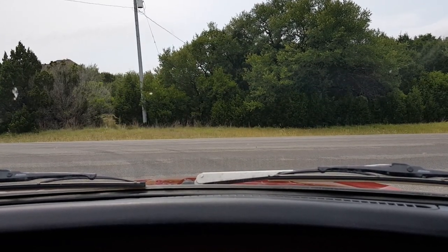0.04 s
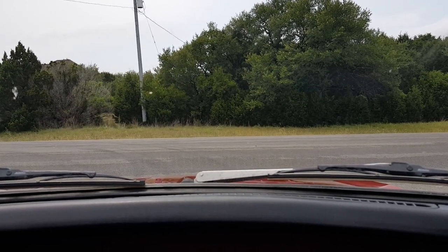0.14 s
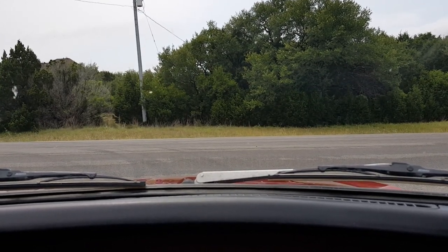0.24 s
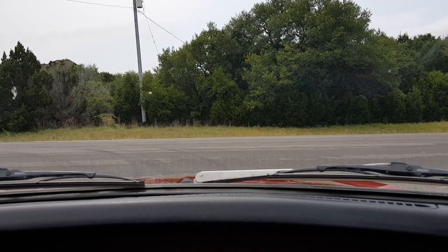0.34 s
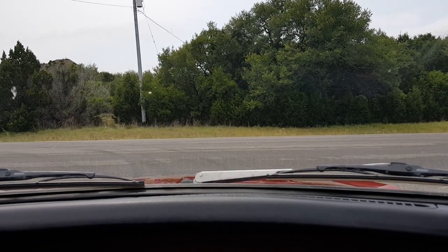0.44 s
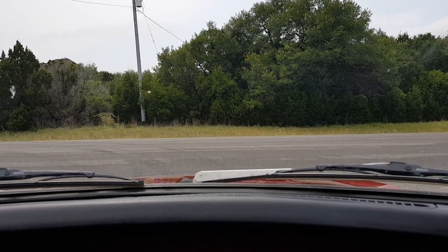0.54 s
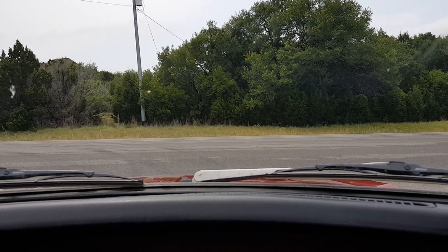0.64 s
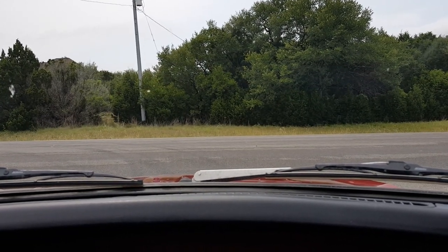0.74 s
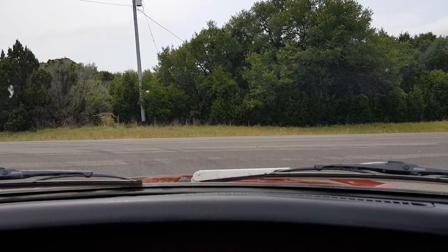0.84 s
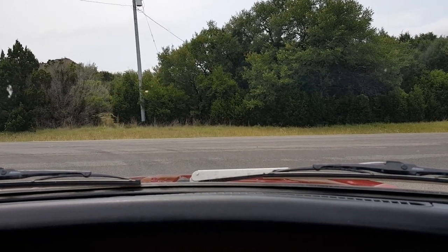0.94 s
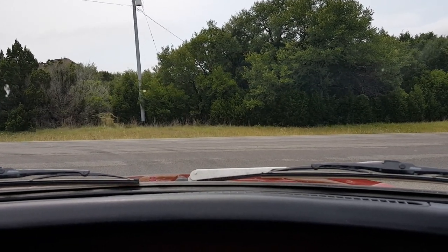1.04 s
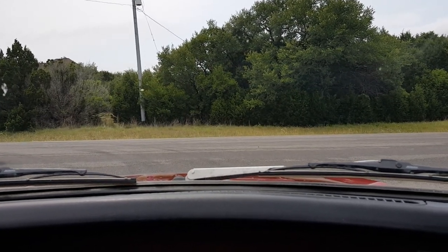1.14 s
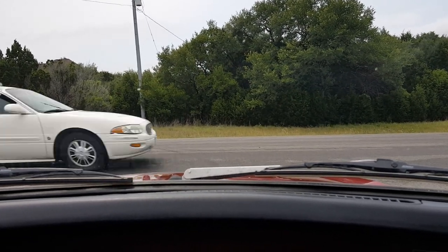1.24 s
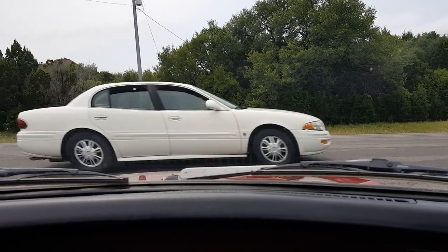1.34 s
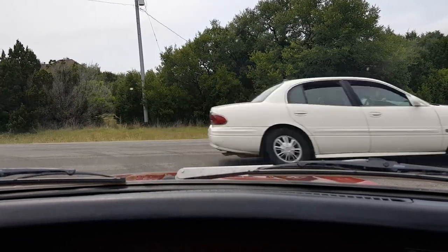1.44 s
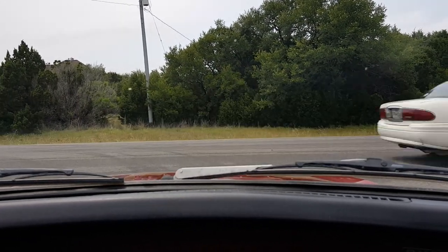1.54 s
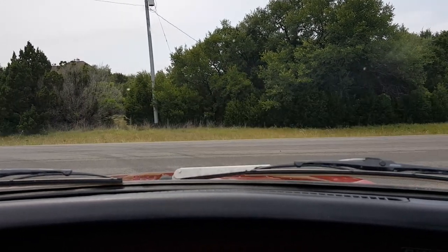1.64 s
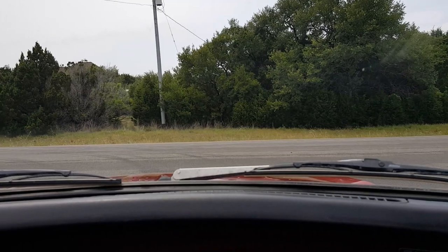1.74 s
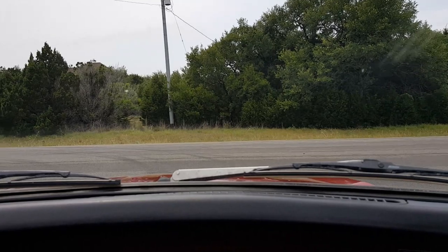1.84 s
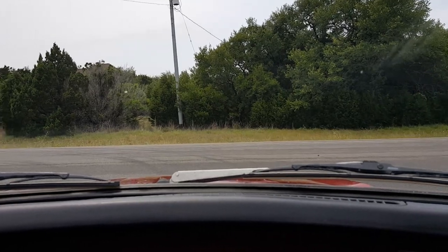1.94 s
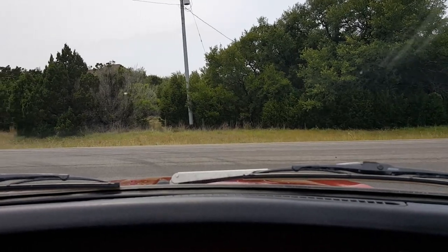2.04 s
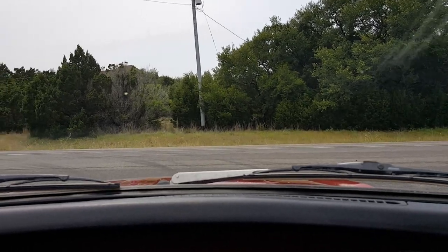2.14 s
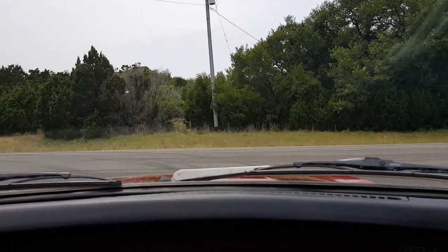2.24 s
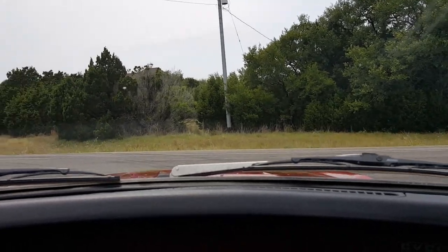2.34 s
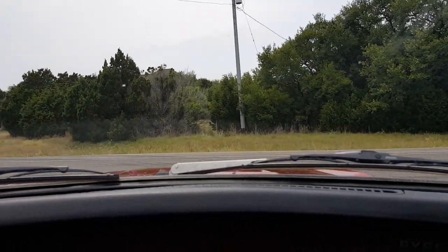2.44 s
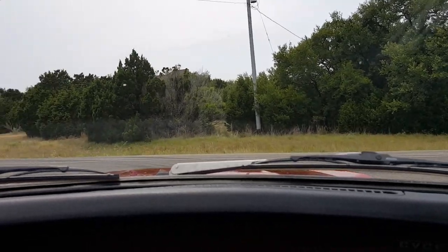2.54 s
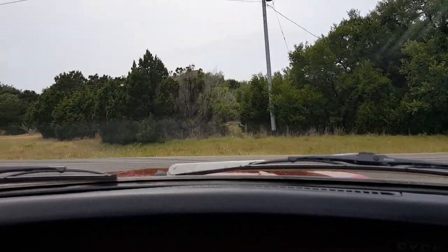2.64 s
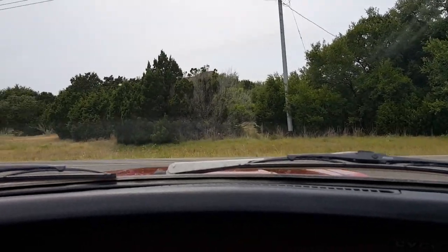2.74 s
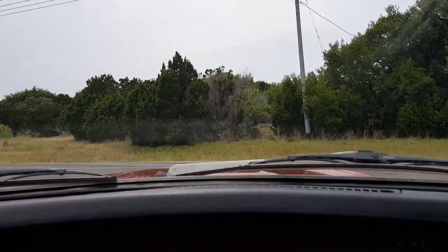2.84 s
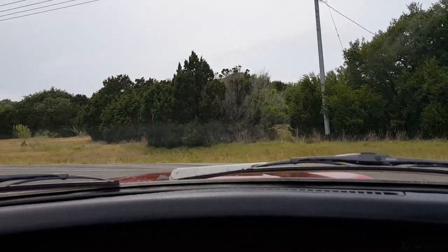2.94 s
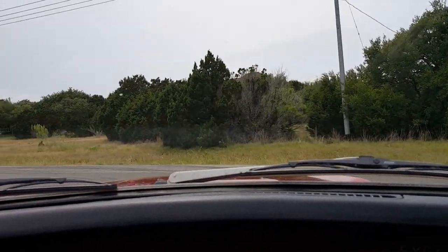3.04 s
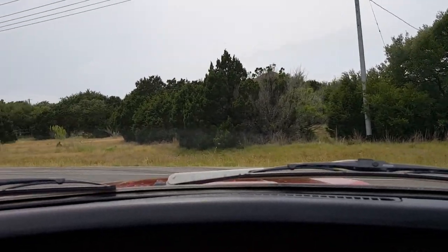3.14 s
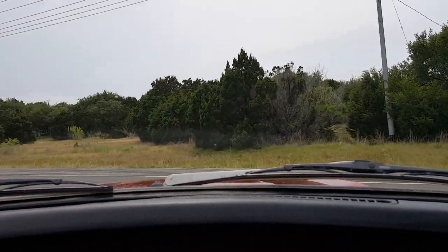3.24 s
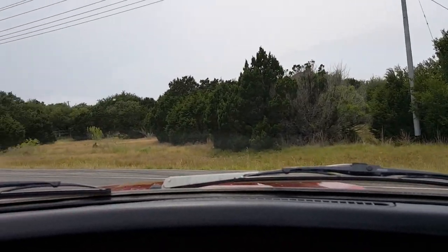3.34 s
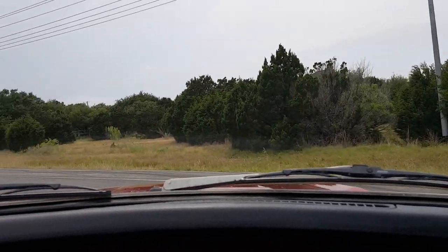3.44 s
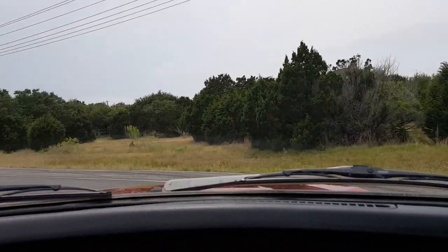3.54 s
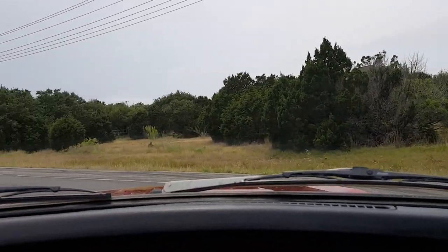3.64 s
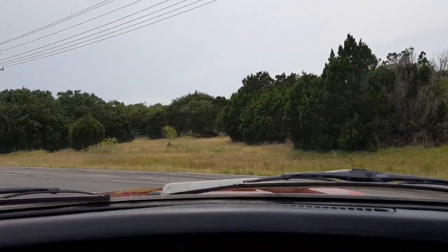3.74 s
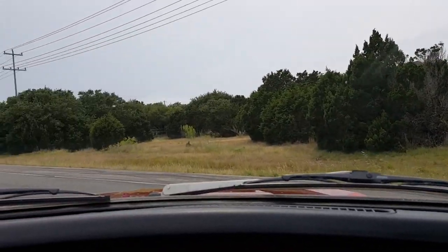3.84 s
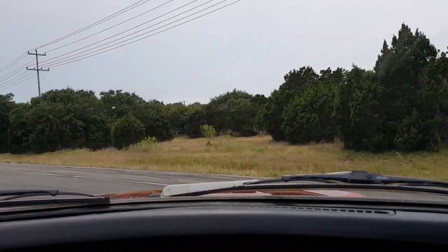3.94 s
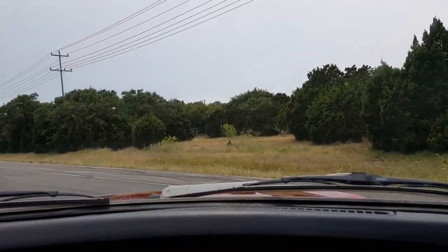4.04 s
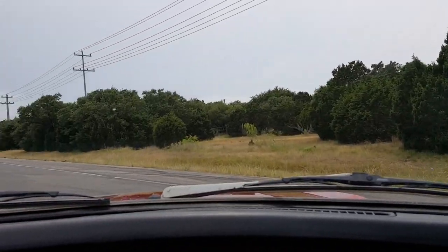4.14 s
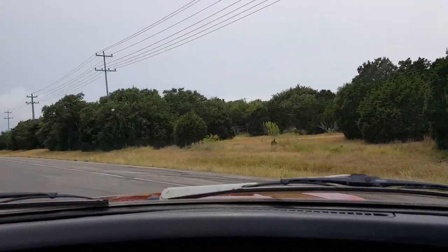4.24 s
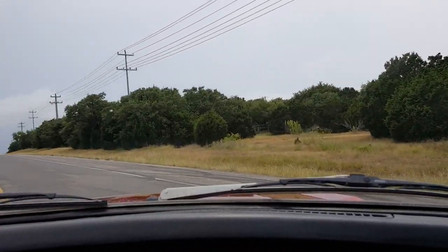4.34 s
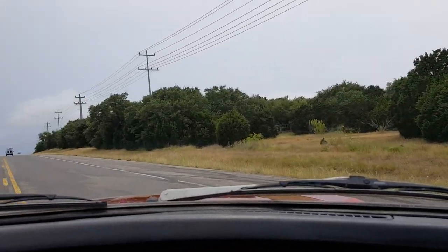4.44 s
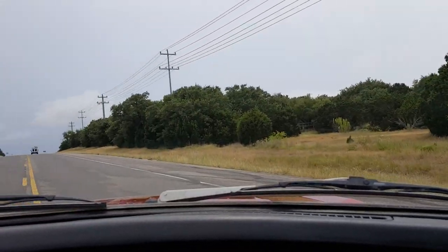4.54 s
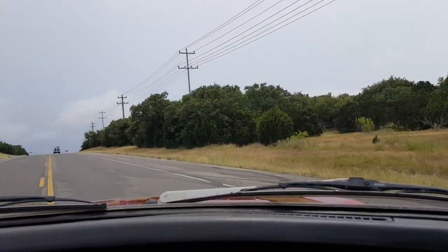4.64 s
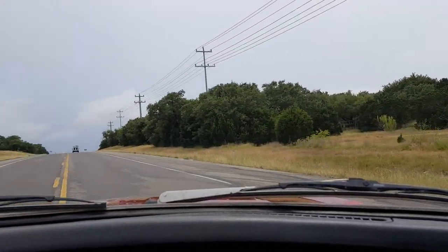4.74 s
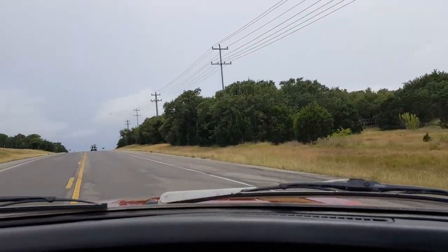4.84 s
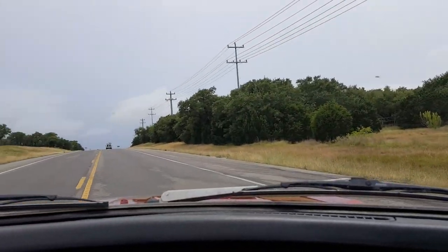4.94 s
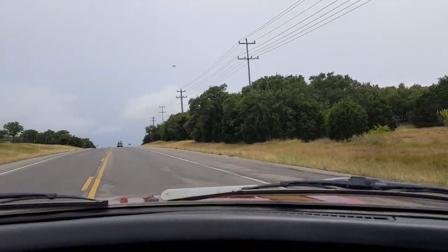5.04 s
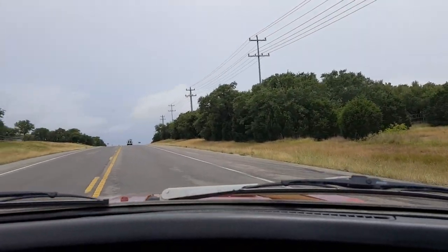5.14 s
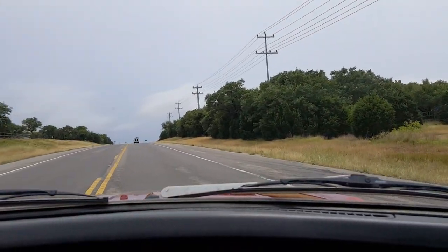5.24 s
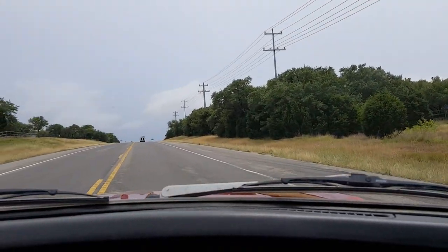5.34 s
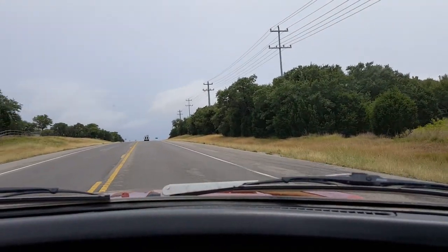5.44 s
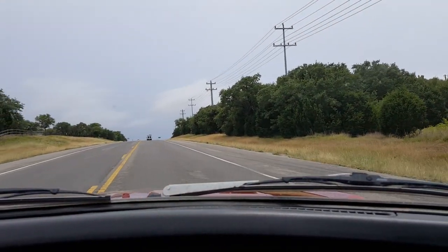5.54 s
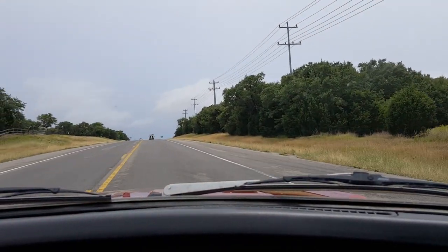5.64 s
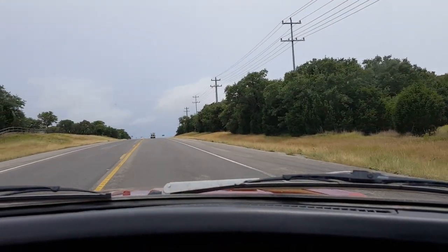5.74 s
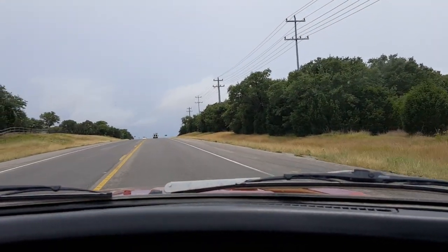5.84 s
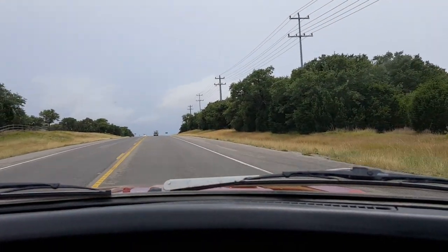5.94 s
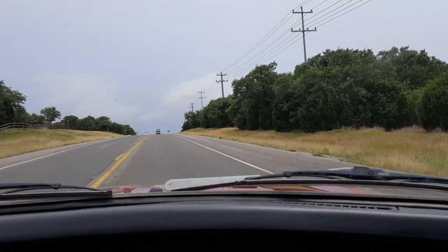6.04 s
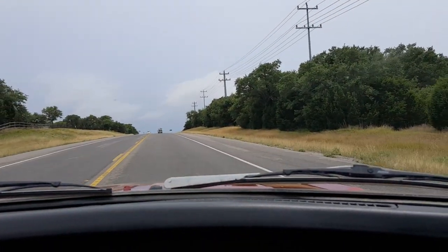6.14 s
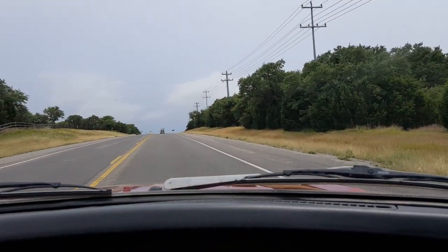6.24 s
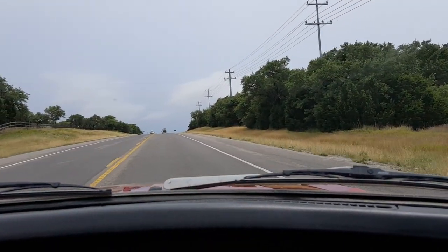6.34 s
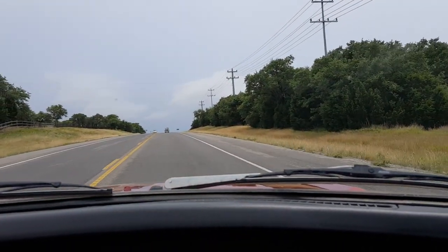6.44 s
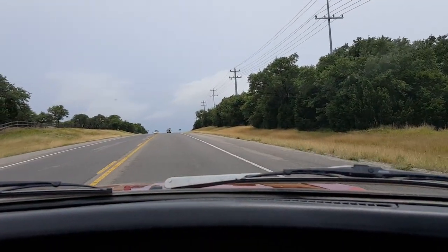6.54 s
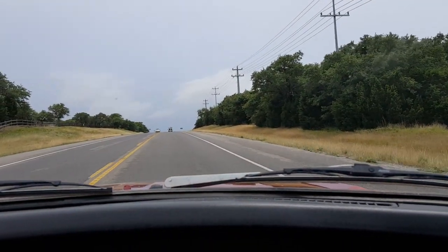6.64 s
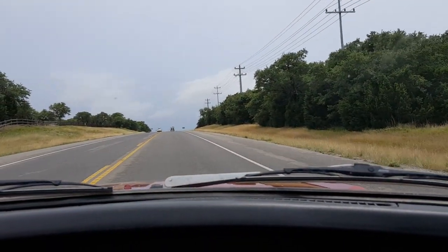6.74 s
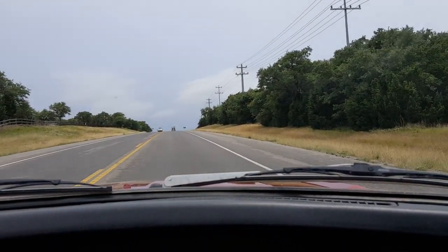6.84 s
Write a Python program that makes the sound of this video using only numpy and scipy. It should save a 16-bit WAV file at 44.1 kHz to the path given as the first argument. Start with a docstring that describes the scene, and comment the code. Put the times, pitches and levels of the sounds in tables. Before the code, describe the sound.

Heard inside a small car, a quiet low idle flutters while the indicator relay clicks in and out. At about one second the revs climb quickly, with a sharp hollow trim knock, and the car pulls away. The boomy, gruff engine note then rises gradually in one gear, growing louder with tyre and road rumble. Deep bumps thump near the end. Close stereo cabin microphones.

```python
"""A small four-cylinder engine heard from inside the car: it idles, pulls out and gathers speed in one gear.
Firing-rate tones boom through cabin resonances over a gruff growl at quarters of the firing rate.
Shaped noise makes the body rumble, combustion, hiss, tyres and road; jolts set damped body modes swinging.
Up close in the cabin the indicator relay ticks and rings, loose trim clicks and knocks, plastics squeak
and a drive belt chirps faintly. A stereo microphone pair adds its own hiss."""
import sys
import numpy as np
from scipy import signal
from scipy.fft import rfft, irfft, next_fast_len
from scipy.io import wavfile

SR = 44100
rng = np.random.default_rng(int(sys.argv[2]) if len(sys.argv) > 2 else 0)


def int16_out(signal):
    """Quantize to a 16-bit WAV file."""
    q = np.round(np.clip(np.atleast_2d(signal).T, -1, 1) * 32767)
    wavfile.write(sys.argv[1], SR, q.astype(np.int16))


N = 303798  # samples
REFERENCE_RATE = 75  # firings per second at which the layer levels and throb depths are stated


def from_db(db):
    """Decibels to amplitude gain."""
    return 10 ** (np.asarray(db) / 20)


def rms_one(x):
    """Scale to unit power."""
    return x / np.sqrt(np.mean(x ** 2) + 1e-20)


def in_time(curve):
    """Read a two-column curve at every sample, straight between its points."""
    time_s, value = np.transpose(curve)
    return np.interp(np.arange(N) / SR, time_s, value)


def at_hz(points, hz):
    """Read a spectrum on a log-frequency axis."""
    known_hz, value = np.transpose(points)
    return np.interp(np.log(hz + 1e-3), np.log(known_hz), value)


def colour(x, spectrum):
    """Filter by a spectrum that falls away beyond its ends; unit power."""
    length = x.shape[-1]
    size = next_fast_len(length)
    hz = np.fft.rfftfreq(size, 1 / SR) + 1e-3
    lowest_hz, highest_hz = spectrum[0][0], spectrum[-1][0]
    skirts = np.minimum(1, np.minimum(hz / lowest_hz, highest_hz / hz)) ** 4
    gain = from_db(at_hz(spectrum, hz)) * skirts
    return rms_one(irfft(rfft(x, size) * gain, size)[..., :length])


# Left-right likeness of the diffuse cabin sound: freq_hz, likeness (1 = identical)
EAR_LIKENESS = [(60, 0.99), (170, 1), (300, .78), (520, 0.69), (900, 0.057), (1500, 0.37), (2600, 0.086),
                (9000, 0.085)]


def diffuse(mid, side):
    """Two unrelated signals become a stereo field, alike in the bass and apart in the treble."""
    size = next_fast_len(N)
    alike = np.clip(at_hz(EAR_LIKENESS, np.fft.rfftfreq(size, 1 / SR)), -.99, .999)
    shared = rfft(mid, size) * np.sqrt(1 + alike)
    opposed = rfft(side, size) * np.sqrt(1 - alike)
    return irfft(np.array([shared + opposed, shared - opposed]), size)[:, :N]


def noise(spectrum):
    """Diffuse stereo noise of a given colour, at unit power."""
    return colour(diffuse(*rng.standard_normal((2, N))), spectrum)


def drift(rate):
    """Random wander through points of unit spread, 2 * rate of them per second."""
    knots = rng.standard_normal(4096)
    return np.interp(np.arange(N) / SR * rate * 2, np.arange(len(knots)), knots)


def swell_and_fade(seconds_from_peak, length_s):
    """Bell-shaped envelope, at half power half a length either side of its peak."""
    return 2 ** (-2 * (seconds_from_peak / length_s) ** 2)


def strikes(times, levels_db):
    """A train of single-sample clicks."""
    out = np.zeros(N)
    positions = np.round(np.asarray(times) * SR).astype(int)
    out[np.clip(positions, 0, N - 1)] = from_db(levels_db)
    return out + 1e-18  # keeps the filters clear of vanishingly small numbers


def die_away(clicks, t60):
    """The exponential envelope that follows each click, falling 60 dB in t60 seconds."""
    return signal.lfilter([1], [1, -from_db(-60 / (t60 * SR))], clicks)


def ring(times, levels_db, modes, spread_db):
    """Every blow sets damped modes ringing, each with a random strength of its own."""
    out = np.zeros(N)
    for hz, db, t60 in modes:
        radius = from_db(-60 / (t60 * SR))
        angle = 2 * np.pi * hz / SR
        strengths_db = levels_db + db + spread_db * rng.standard_normal(len(times))
        resonator = [1, -2 * radius * np.cos(angle), radius * radius]
        out += signal.lfilter([0, np.sin(angle)], resonator, strikes(times, strengths_db))
    return out


# Strongest engine lines: firing_multiple, level_db before load and cabin
ENGINE_LINES = [(1, -0.14), (2, -0.6), (2.25, -16), (2.5, -24.5), (3, -8), (3.5, -19), (4, -13), (5, -20),
                (6, -25.5), (6.5, -35.5), (8, -37.5), (9, -34), (14.5, -36.5)]


def boom(firings, rate, load_db, waver_db, size=200):
    """Nearly pure engine lines pump the cabin air and swell through its resonances; high ones waver more."""
    out = np.zeros(N)
    speeds = np.linspace(rate.min(), rate.max(), size)
    for multiple, db in ENGINE_LINES:
        answer_db = np.interp(rate, speeds, cabin_db(multiple * speeds))
        level = from_db(db + load_db + answer_db + waver_db * np.sqrt(multiple) * drift(8))
        out -= np.sqrt(2) * level * np.sin(2 * np.pi * multiple * firings)
    return out


# Resonances of mounts, cabin air and panels: centre_hz, width_hz (between -6 dB points), level_db
CABIN_RESONANCES = [(28.1, 11.2, -23.5), (61.4, 4.8, -15), (70.45, 9.2, -12), (82.86, 6.76, -14.5),
                    (87.6, 16, -24), (125.6, 9.4, -15), (133.4, 42.3, -19.5), (191.8, 30, -28),
                    (229.9, 31, -21), (269.3, 12, -25.5), (295.8, 36, -20.5), (400, 17, -21),
                    (429, 52, -23.5), (507, 50, -20.5), (780, 330, -18.5), (1173, 65, -13)]


def cabin_db(hz):
    """How strongly the cabin answers at a frequency: its resonances add in power."""
    power = 0
    for centre, width, db in CABIN_RESONANCES:
        power = power + from_db(db) ** 2 / (1 + (2 * (hz - centre) / width) ** 2) ** 2
    return 10 * np.log10(power)


# Moments when one line sings out: firing_multiple, peak_s, length_s, level_db before waver
LINE_SWELLS = [(4, 1.286, 0.097, -31), (5, 2.64, 0.31, -39.5), (2.25, 3.25, .4, -25.5),
               (8, 3.5, 0.33, -51.5), (5.75, 3.85, .38, -42.5), (2.5, 3.99, 0.24, -28.5),
               (6.5, 4.41, 0.27, -43), (3.5, 4.93, 0.22, -35), (6, 5.23, .35, -43.5), (9, 6.55, 0.69, -49)]


def swells(firings, waver_db):
    """Single engine lines sing out for a moment as they sweep through a panel or pipe resonance."""
    t, out = np.arange(N) / SR, np.zeros(N)
    for multiple, peak_s, length_s, db in LINE_SWELLS:
        near = np.abs(t - peak_s) < 2 * length_s
        wavering = from_db(db + waver_db * drift(8.7)[near])
        bell = swell_and_fade(t[near] - peak_s, length_s) * wavering
        tone = np.sin(2 * np.pi * (multiple * firings[near] + rng.random()))
        out[near] += np.sqrt(2) * bell * tone
    return out


# Colour of the gruff engine note: freq_hz, relative_level_db
GROWL_COLOUR = [(110, -32), (170, 3.5), (250, 0), (320, -6), (390, -1), (490, -2.5), (620, -6), (720, -8),
                (810, -2), (930, -15.5), (1150, -12.5), (1400, -17), (2200, -31), (3500, -40)]
GROWL_DB, GROWL_PER_LOAD = -38, 1.016  # dB at zero load; dB per dB of load


def growl(firings, load_db, rough, size=8192, count=150):
    """Four unequal cylinders repeat every fourth firing: lines at each quarter of the firing rate."""
    lines = np.exp(2j * np.pi * rng.random(count))
    lines[::2] *= from_db(5)  # whole turns of the crank stand out
    lines[0:21:4] = 0  # the five lowest firing multiples belong to the boom
    # no two burns are timed quite alike, which blurs the highest lines
    cycles = (firings + rough * drift(7.7)) / 4
    # each line meets the two ears out of step
    skew = 1j * rng.choice([-1, 1], count)
    waves = [irfft(spectrum, size) for spectrum in (lines, lines * skew)]
    paths = [np.interp(cycles % 1 * size, np.arange(size), wave) for wave in waves]
    return from_db(GROWL_DB + GROWL_PER_LOAD * load_db) * colour(diffuse(*paths), GROWL_COLOUR)


def throb(firings, depth):
    """Unit-power swelling of a noise with every firing."""
    return rms_one(1 + np.clip(depth, 0, 1) * np.cos(2 * np.pi * firings))


# Colour of the low body rumble: freq_hz, relative_level_db
BODY_COLOUR = [(70, -38.5), (105, -8.5), (125, 0), (152, 1.5), (190, -9.5), (240, -22.5), (320, -16.5),
               (550, -52)]
# Level of the body rumble: time_s, level_db
BODY_RUMBLE_LEVEL = [(0, -39), (.28, -37), (.36, -44.5), (.8, -41), (1.05, -31.5), (2.4, -34), (3.1, -29),
                     (4.4, -26), (4.56, -30), (4.9, -28.5), (5.35, -28.5), (5.6, -27), (6.89, -27.5)]
BODY_THROB = 0.11  # depth at the reference rate


def body_rumble(firings, rate):
    """The engine shakes low noise out of the body; single firings stand out at idle and blur with speed."""
    pulses = throb(firings, BODY_THROB * REFERENCE_RATE / rate)
    return from_db(in_time(BODY_RUMBLE_LEVEL)) * noise(BODY_COLOUR) * pulses


# Colour of the combustion noise: freq_hz, relative_level_db
COMBUSTION_COLOUR = [(450, -25), (680, -9.5), (800, -2.5), (900, -6.5), (1010, -3), (1300, -13), (1600, -9),
                     (1900, -13), (2250, -12.5), (2800, -20), (3500, -24.5), (5500, -34.5)]
# Colour of the engine hiss: freq_hz, relative_level_db
HISS_COLOUR = [(2000, -7.5), (3000, -9.5), (4100, -3.5), (4700, -18.5), (5400, -11), (6500, -12),
               (8000, -11.5), (9000, -12.5), (9900, -22), (11600, -21), (13500, -19.5), (15800, -21)]
# dB at zero load and reference rate; dB per dB of load; dB per octave of engine speed
BURN_DB, BURN_PER_LOAD, BURN_DB_PER_OCTAVE = -43.5, 0.27, 4
HISS_DB, HISS_PER_LOAD, HISS_DB_PER_OCTAVE = -62, .25, 3.5
BURN_THROB = 0.07  # depth at the reference rate


def combustion_and_hiss(firings, rate, load_db):
    """Combustion noise and hiss grow with load and speed and throb with the firings, most at idle."""
    octaves = np.log2(rate / REFERENCE_RATE)
    burn = from_db(BURN_DB + BURN_PER_LOAD * load_db + BURN_DB_PER_OCTAVE * octaves) * noise(COMBUSTION_COLOUR)
    hiss = from_db(HISS_DB + HISS_PER_LOAD * load_db + HISS_DB_PER_OCTAVE * octaves) * noise(HISS_COLOUR)
    return (burn + hiss) * throb(firings, BURN_THROB * REFERENCE_RATE / rate)


BELT_HZ, BELT_DB = 2225, -63
BELT_LATE_FIRINGS = .2  # delay in firing periods


def belt(firings, wander):
    """Just after each firing the drive belt chirps faintly and reaches the two ears out of step."""
    phase = 2 * np.pi * BELT_HZ * np.arange(N) / SR + wander * drift(60)
    sides = np.array([np.cos(phase), np.sin(phase)])
    pulses = throb(firings - BELT_LATE_FIRINGS, depth=0.91) ** 2
    return from_db(BELT_DB) * rms_one(sides * pulses)


# Moments when the indicator relay pulls in: start_s
RELAY_PULLS_IN = [.0824, .7257, 1.3375, 1.9515, 2.5727, 3.1953, 3.799, 4.391, 4.994]
# Ringing of the relay frame: pitch_hz, relative_level_db, t60_s
FRAME_MODES = [(3020, -8, .09), (4940, -5.5, .08), (6100, -11, .04), (6750, -7, .04), (7350, -3, .05),
               (7810, -6, .05), (9460, -11, .04), (13100, -11, .04)]
# Pings of the armature: pitch_hz, relative_level_db, t60_s
ARMATURE_PINGS = [(11070, -2, .07), (11500, 0, .05), (12100, -4, .04)]
# Colour of the contact snap: freq_hz, relative_level_db
SNAP_COLOUR = [(2500, -13), (5000, -2), (7300, 2), (10000, -4.5), (12500, -1.5), (15500, -10)]
RELAY_HOLD_S = .2987  # it lets go this long after pulling in
RELAY_IN_DB, RELAY_OUT_DB = -52.5, -53.5  # tick strengths before the trims of each part


def indicator():
    """The relay snaps in and out; on every pull-in its armature strikes home and pings."""
    ticks = []
    for start_s in RELAY_PULLS_IN:
        ticks += [(start_s, RELAY_IN_DB), (start_s + RELAY_HOLD_S, RELAY_OUT_DB)]
    times, db = np.transpose(ticks)
    # each side gets its own random mode strengths
    frame = [ring(times, db - 2, FRAME_MODES, spread_db=2) for _ in range(2)]
    armature = [ring(times[::2], db[::2] - 6, ARMATURE_PINGS, spread_db=2) for _ in range(2)]
    snap = noise(SNAP_COLOUR) * die_away(strikes(times, db - 1), t60=.07)
    return np.array(frame) + np.array(armature) + snap


# Contacts of loose trim: start_s, strength_db, tilt_db (knock over crack)
TRIM_CONTACTS = [(0.049, -51, 14), (0.055, -49.5, 12), (0.29, -53, 0), (1.0576, -49.5, -13),
                 (1.0805, -42.5, -6), (1.123, -38, -8.5), (1.168, -50, -12), (1.2466, -26, 0.5),
                 (1.2496, -36.5, 5), (1.266, -47, 18), (2.038, -49, -9.5), (2.226, -49, 20),
                 (2.801, -53.5, 19.5), (4.8394, -47, -1), (5.185, -47.5, -11.5), (5.486, -49.5, -26),
                 (6.096, -52, -8), (6.713, -47, -4)]
# Colour of the hollow knock: freq_hz, relative_level_db
THUD_COLOUR = [(300, -16), (700, -5.5), (900, -0.5), (1300, 0), (1600, 0.5), (2000, -10.5), (2500, -8.5),
               (3800, -21.5), (8000, -34)]
# Colour of the sharp crack: freq_hz, relative_level_db
CRACK_COLOUR = [(1500, -8), (3000, 4), (3900, -9.5), (4700, 1.5), (6400, 1.5), (8000, -9), (9200, -1.5),
                (10100, -22.5), (11800, -12.5), (13000, -22.5), (15500, -32.5)]


def trim():
    """Plastic contacts: a sharp crack and a hollow knock, scattered briefly by the cabin."""
    times, db, tilt_db = np.transpose(TRIM_CONTACTS)
    low = strikes(times, db + tilt_db / 2)
    high = strikes(times, db - tilt_db / 2)
    # each part has a long tail and a short one
    thud_decay = from_db(-3) * die_away(low, t60=0.12) + from_db(2) * die_away(low, t60=0.011)
    crack_decay = from_db(-15) * die_away(high, t60=0.13) + from_db(-14.5) * die_away(high, t60=0.032)
    return noise(THUD_COLOUR) * thud_decay + noise(CRACK_COLOUR) * crack_decay


# Dashboard plastics rubbing: peak_s, pitch_hz, length_s, peak_db
PLASTIC_RUBS = [(1.70, 5200, .035, -56), (2.003, 13800, .015, -70), (2.375, 14500, .018, -52)]


def squeaks():
    """Brief, thin rubs of plastic on plastic: bell-shaped tones with a jittering phase."""
    t, out = np.arange(N) / SR, np.zeros(N)
    for peak_s, hz, length_s, db in PLASTIC_RUBS:
        tone = np.sin(2 * np.pi * hz * t + 2 * drift(300))
        out += from_db(db) * swell_and_fade(t - peak_s, length_s) * tone
    return out


# Jolts, two shudders at idle and then dips in the road: start_s, strength_db
BODY_JOLTS = [(0.14, -35), (0.289, -42), (5.825, -26), (5.864, -26), (6.083, -22), (6.307, -20.5)]
# Body on its springs and tyres: pitch_hz, relative_level_db, t60_s
SUSPENSION_MODES = [(36, -8, 0.22), (48, 4.5, 0.25), (68, -10.5, 0.085), (106.5, -5, 0.13)]


def bumps():
    """Each jolt sets the body swinging; the suspension softens the blow."""
    swing = ring(*np.transpose(BODY_JOLTS), SUSPENSION_MODES, spread_db=2)
    return signal.sosfilt(signal.butter(2, [30, 180], "band", fs=SR, output="sos"), swing)


# Colour of the tyre noise: freq_hz, relative_level_db
TYRE_COLOUR = [(150, -14.5), (205, 8.5), (250, -4.5), (310, 2.5), (380, -5), (460, -4), (560, -12),
               (680, -10.5), (900, -32), (1500, -54)]
# dB at zero load and reference rate; dB per dB of load; dB per octave of engine speed
TYRE_DB, TYRE_PER_LOAD, TYRE_DB_PER_OCTAVE = -33, 0.46, 6


def tyre_noise(rate, load_db):
    """Tyre noise rises with load and, in the one gear, with engine speed."""
    octaves = np.log2(rate / REFERENCE_RATE)
    level_db = TYRE_DB + TYRE_PER_LOAD * load_db + TYRE_DB_PER_OCTAVE * octaves
    return from_db(level_db) * noise(TYRE_COLOUR)


# Colour of the road rumble: freq_hz, relative_level_db
ROAD_COLOUR = [(22, -21), (30, -11), (41, -4), (52, -5), (68, 0), (95, -4), (125, -12), (220, -38)]
# Rumble of the road surface: time_s, level_db
ROAD_RUMBLE_LEVEL = [(0, -37.5), (.8, -39), (1.05, -31.5), (2.25, -28), (3.3, -33), (4.7, -30.5),
                     (5.5, -35), (5.87, -17.5), (6.1, -31), (6.89, -25.5)]


def road_rumble():
    """The road surface shakes deep noise into the cabin, at a level that follows its own curve."""
    return from_db(in_time(ROAD_RUMBLE_LEVEL)) * noise(ROAD_COLOUR)


# Colour of the microphone hiss: freq_hz, relative_level_db
MIC_HISS_COLOUR = [(3000, -6.5), (8800, -4), (10000, -2), (11800, 2.5), (15800, -4)]
MIC_HISS_DB = -79.5


def microphone_hiss():
    """Steady faint noise of the microphones."""
    return from_db(MIC_HISS_DB) * noise(MIC_HISS_COLOUR)


# Engine speed: time_s, firings_per_s
FIRING_RATE = [(0, 25.1), (.6, 25.6), (.87, 29.3), (1.2, 52), (1.4, 59.3), (1.7, 61.6), (2, 61.4),
               (2.8, 62.7), (3.25, 68.7), (3.45, 70.2), (3.8, 74.7), (4.2, 74.8), (4.6, 77.3), (5.08, 80.4),
               (5.35, 85.7), (5.6, 87.2), (6.4, 91), (6.89, 95.2)]
# How hard the engine pulls, easing twice for a moment: time_s, load_db
ENGINE_LOAD = [(0, -12), (.45, -18), (.8, -16), (1.15, -4.5), (2.5, -7), (3.5, -2), (4.42, -0.5),
               (4.56, -3), (5.2, 2.5), (5.28, -1.5), (5.45, 0.5), (5.56, 4.5), (6.89, 5)]
LEFT_LEAD_DB, LEFT_LAG_S = 1.5, 0.00026


def scene():
    """Engine speed times the layers; all but microphone hiss reach the left side louder and a little later."""
    rate, load_db = in_time(FIRING_RATE), in_time(ENGINE_LOAD)
    firings = np.cumsum(rate) / SR  # running count of firings
    engine = boom(firings, rate, load_db, waver_db=0.6) + swells(firings, waver_db=5.0)
    engine = engine + growl(firings, load_db, rough=.004) + body_rumble(firings, rate)
    engine = engine + combustion_and_hiss(firings, rate, load_db) + belt(firings, wander=1.0)
    fittings = indicator() + trim() + squeaks()
    left, right = engine + fittings + bumps() + tyre_noise(rate, load_db) + road_rumble()
    left = np.pad(left, (round(LEFT_LAG_S * SR), 0))[:N]
    cabin = np.array([left * from_db(LEFT_LEAD_DB / 2), right * from_db(-LEFT_LEAD_DB / 2)])
    return cabin + microphone_hiss()


CUTOFF_HZ = 15850


def record(dry):
    """A tenth-order elliptic low-pass cuts the top steeply."""
    return signal.sosfilt(signal.ellip(10, .1, 80, CUTOFF_HZ, fs=SR, output="sos"), dry)


dry = scene()
out = record(dry)
int16_out(out)
```